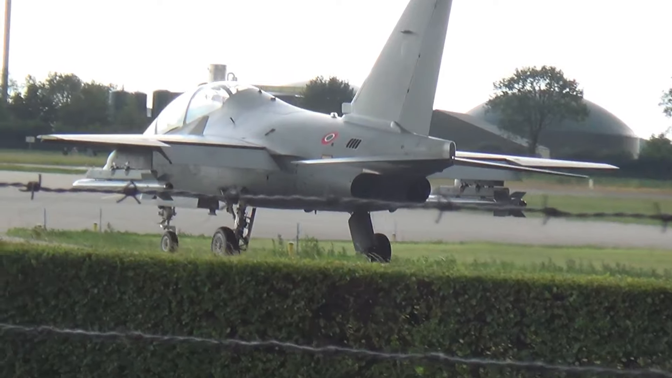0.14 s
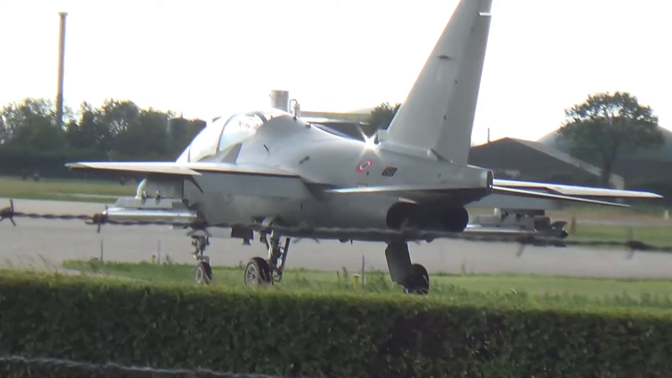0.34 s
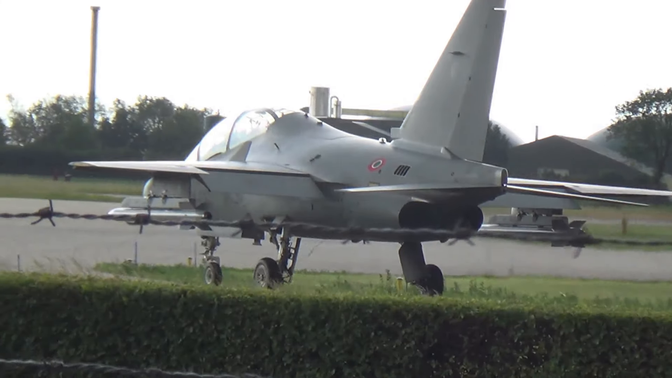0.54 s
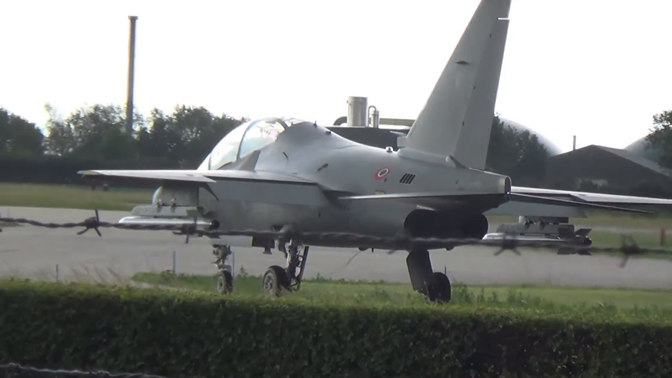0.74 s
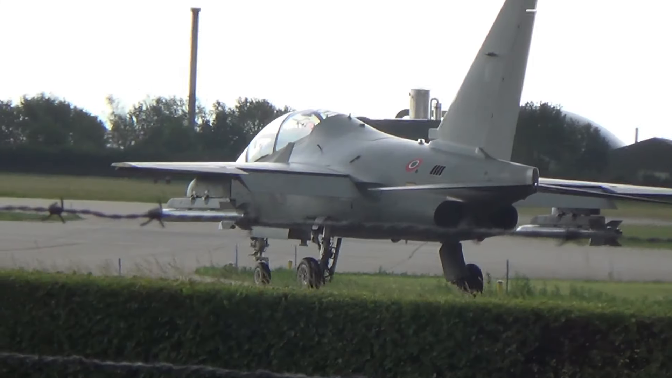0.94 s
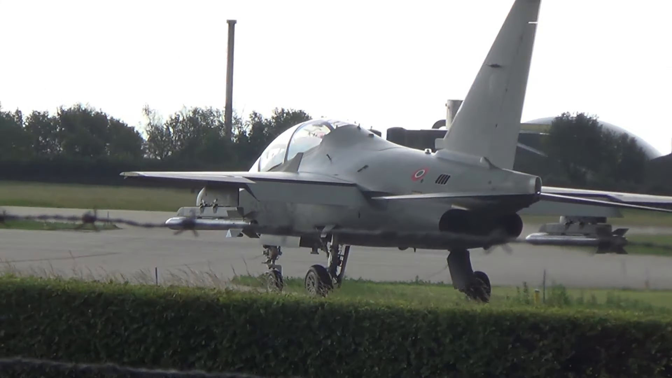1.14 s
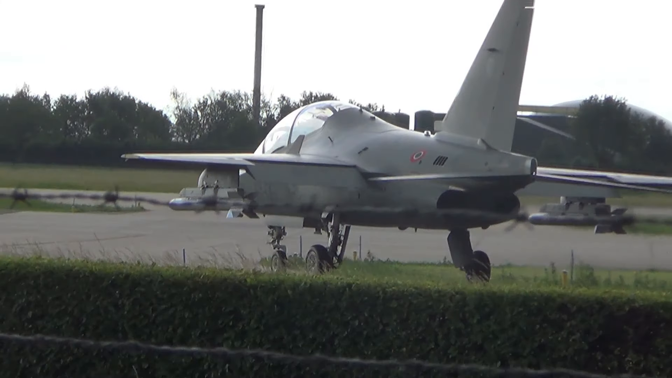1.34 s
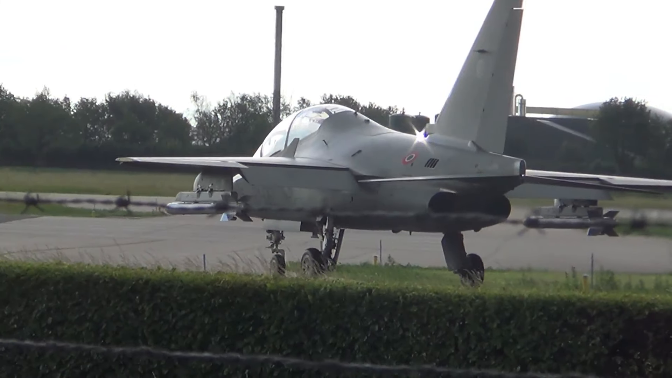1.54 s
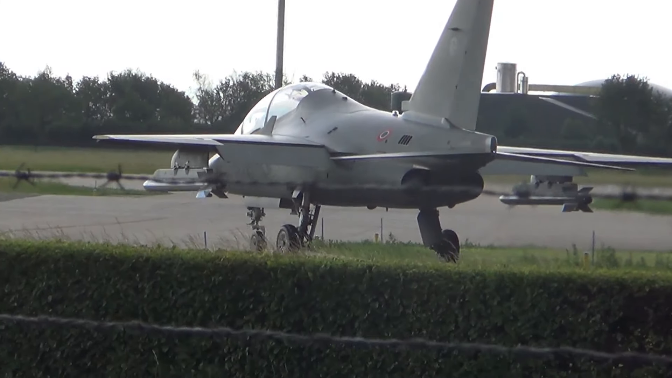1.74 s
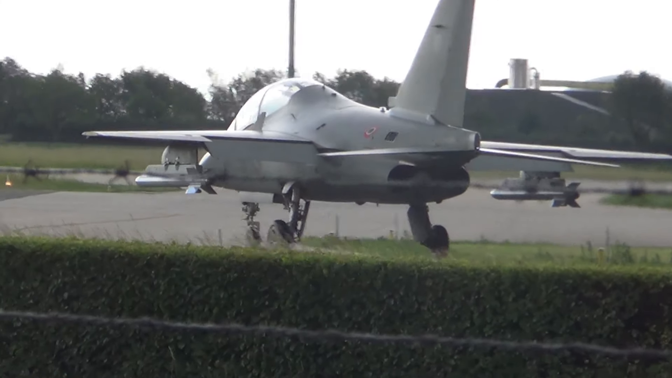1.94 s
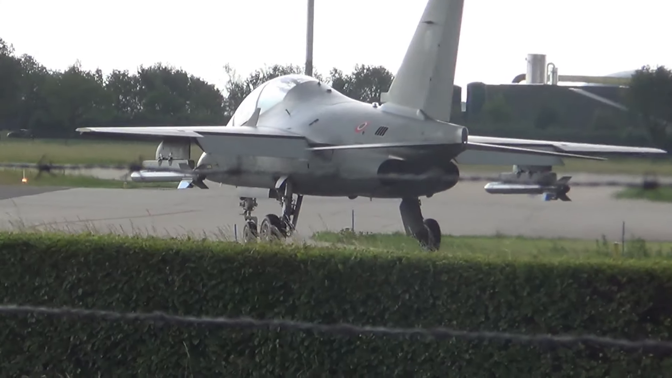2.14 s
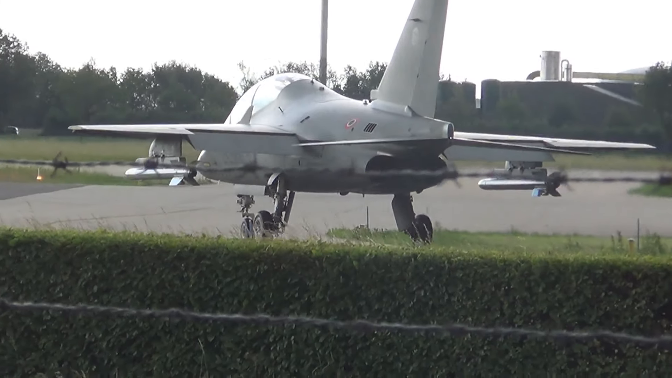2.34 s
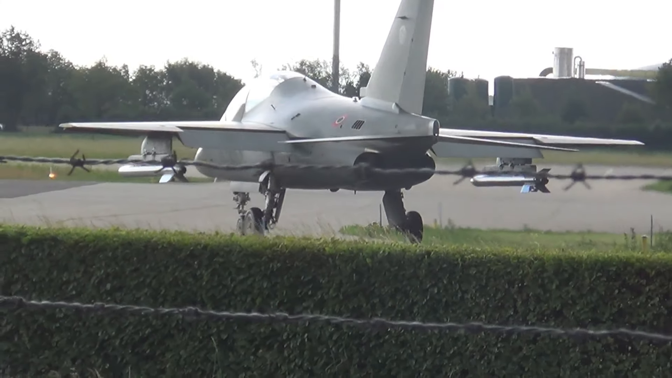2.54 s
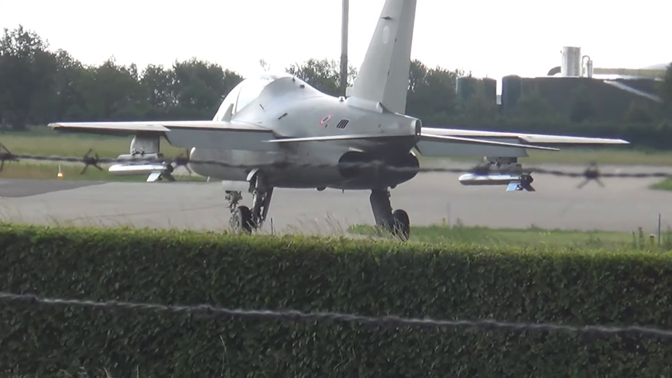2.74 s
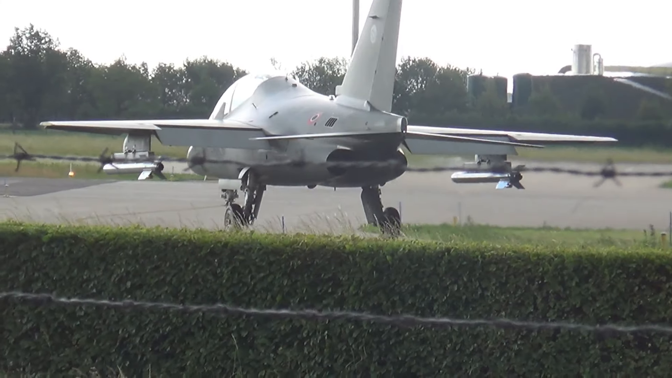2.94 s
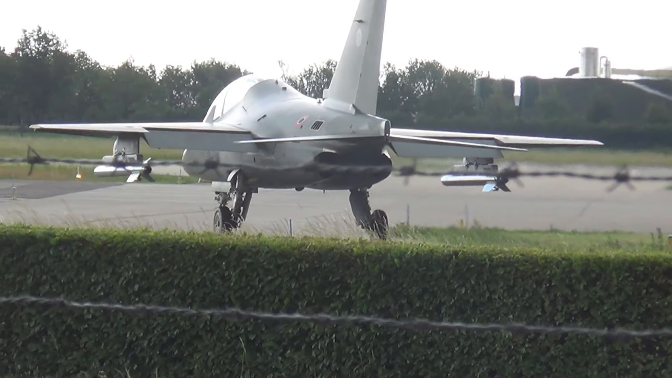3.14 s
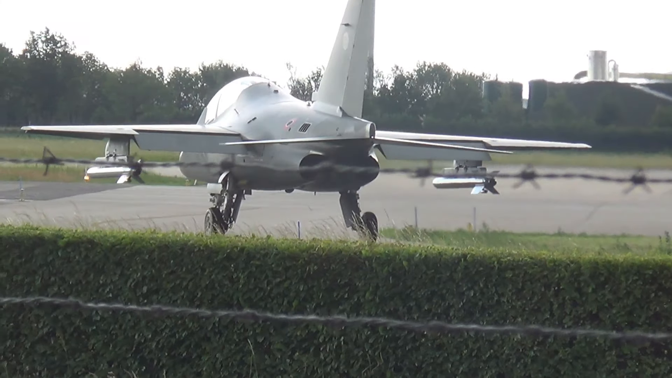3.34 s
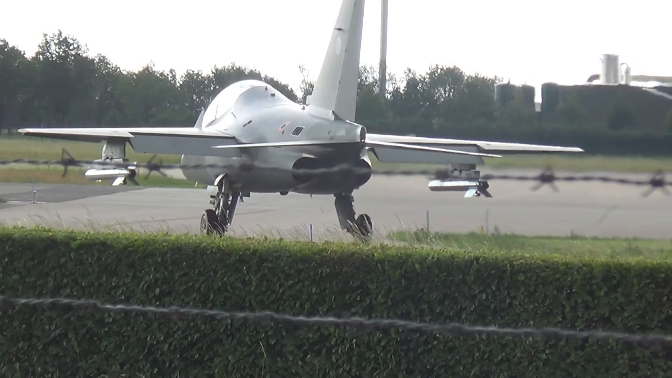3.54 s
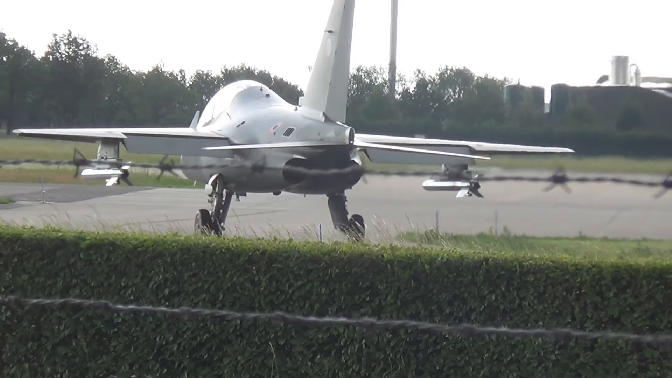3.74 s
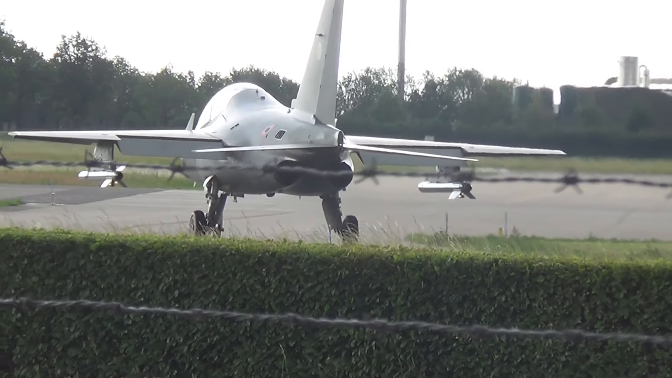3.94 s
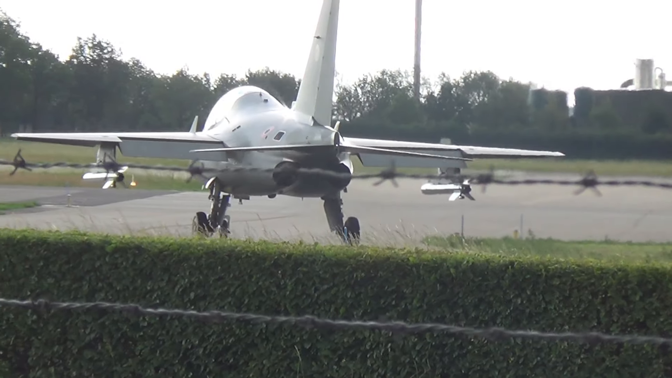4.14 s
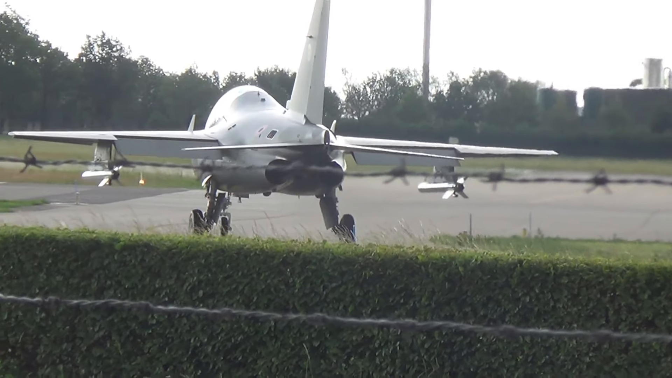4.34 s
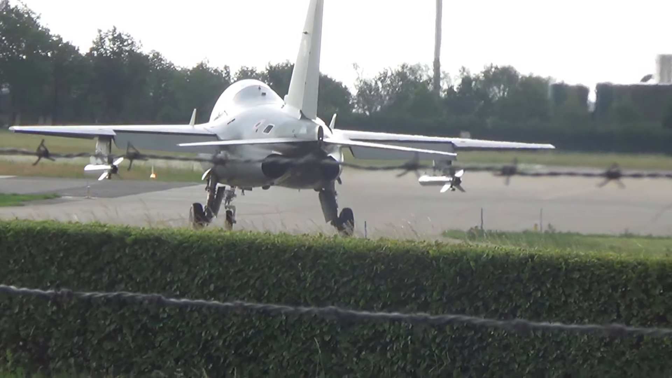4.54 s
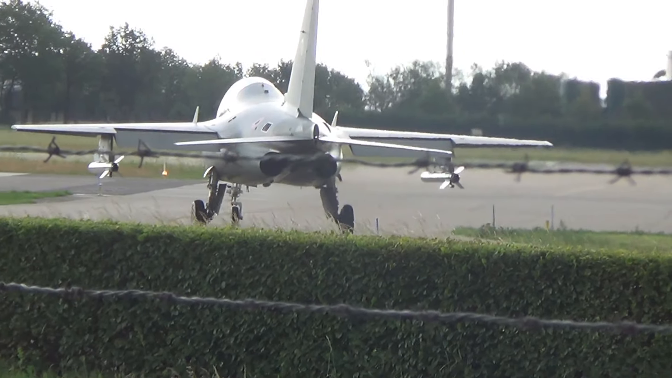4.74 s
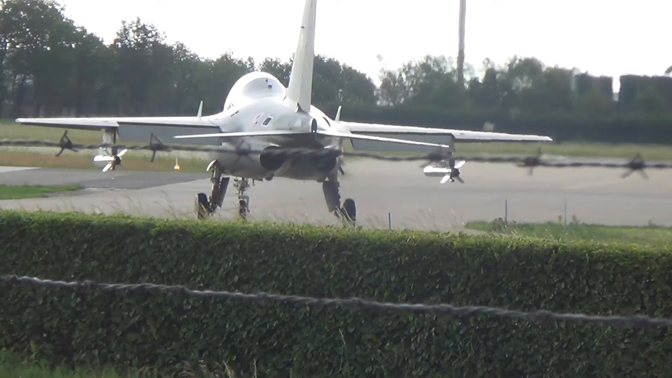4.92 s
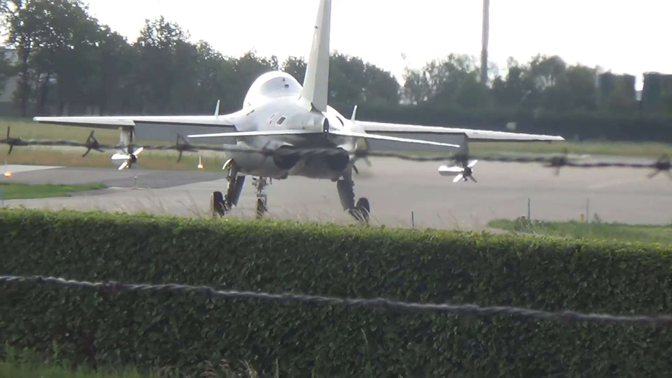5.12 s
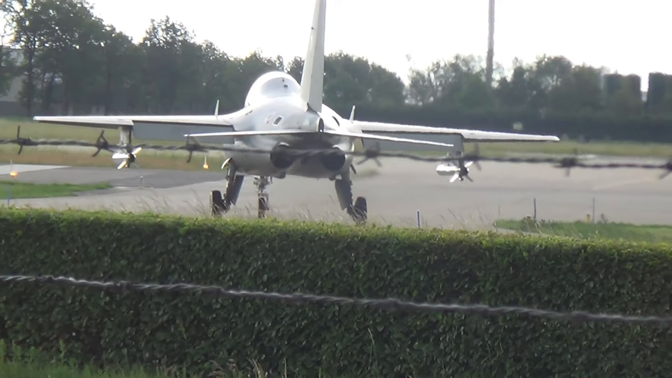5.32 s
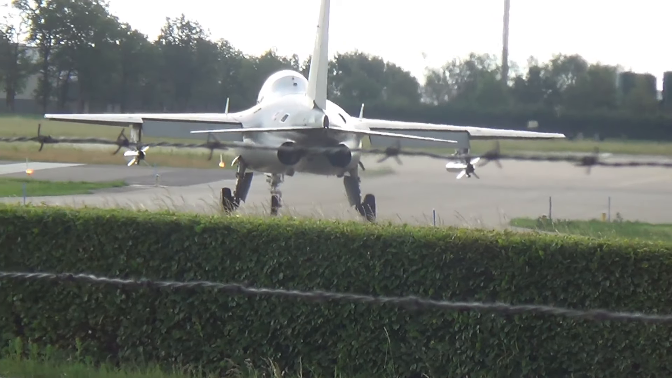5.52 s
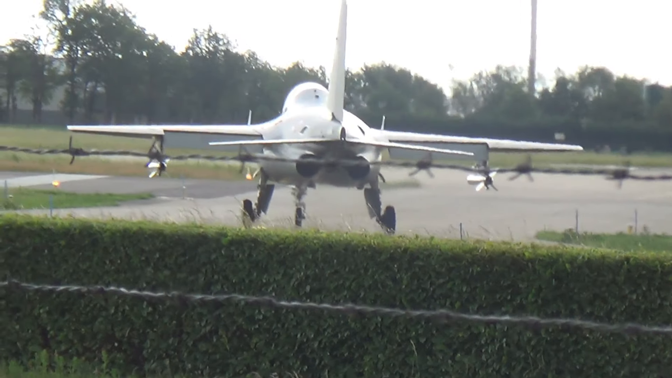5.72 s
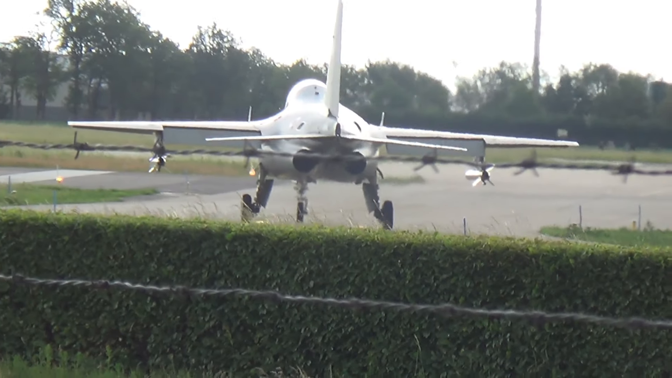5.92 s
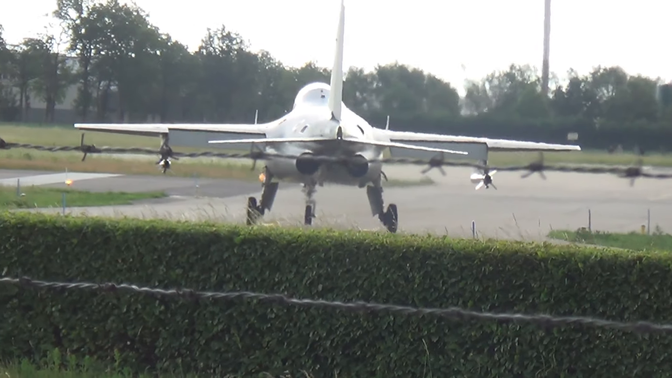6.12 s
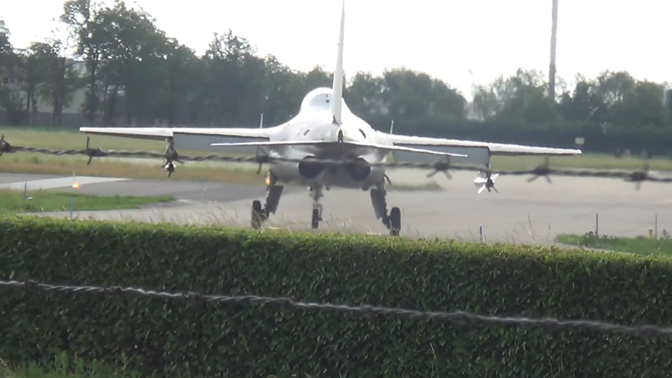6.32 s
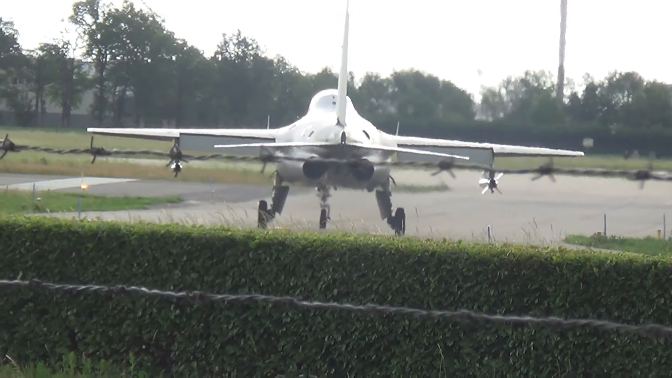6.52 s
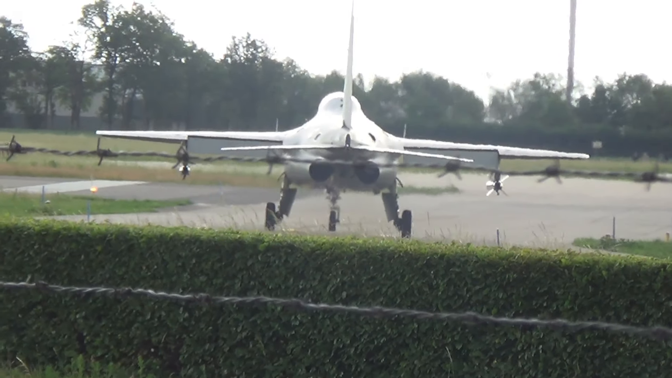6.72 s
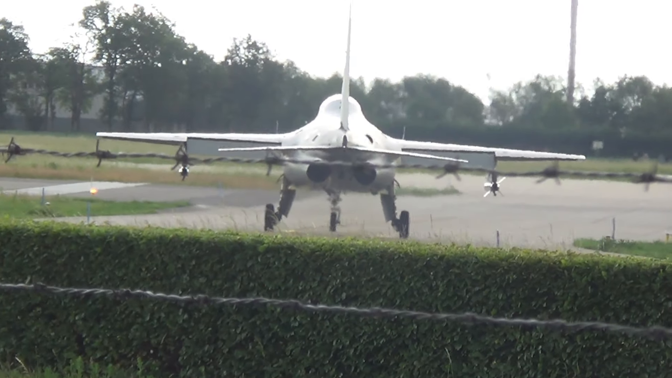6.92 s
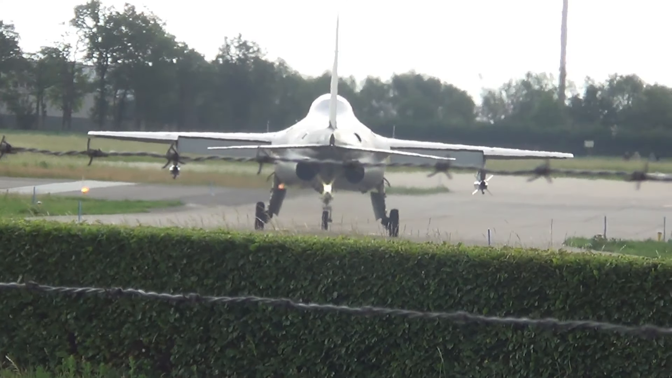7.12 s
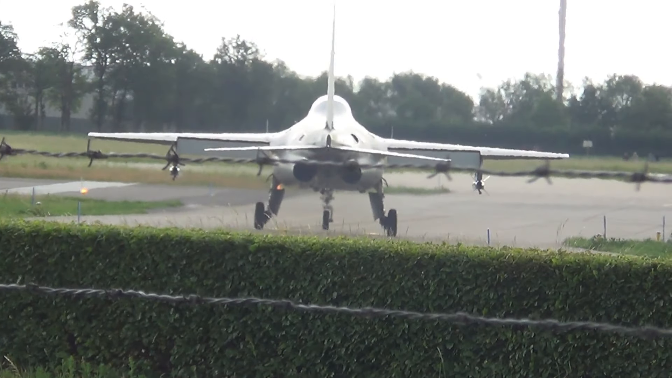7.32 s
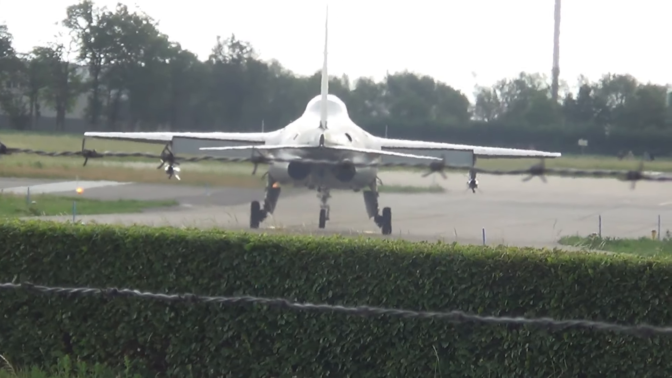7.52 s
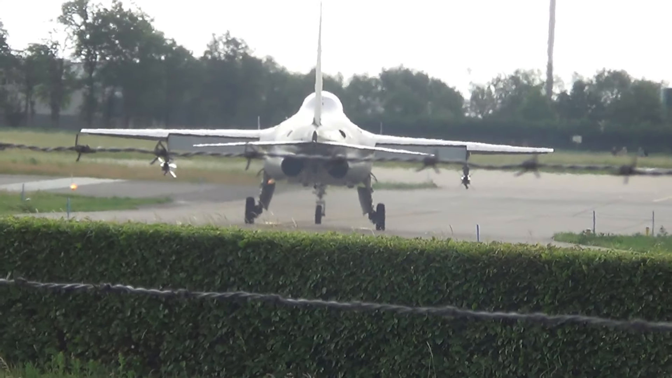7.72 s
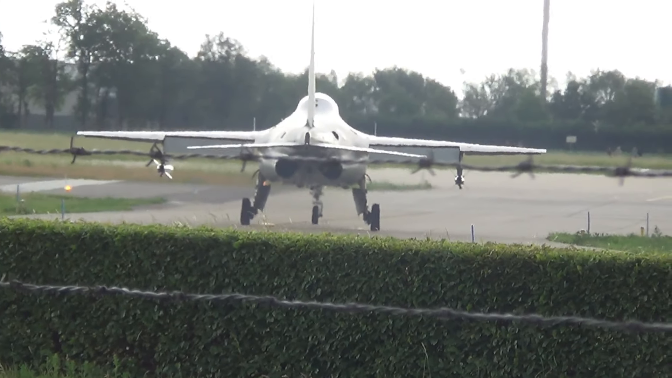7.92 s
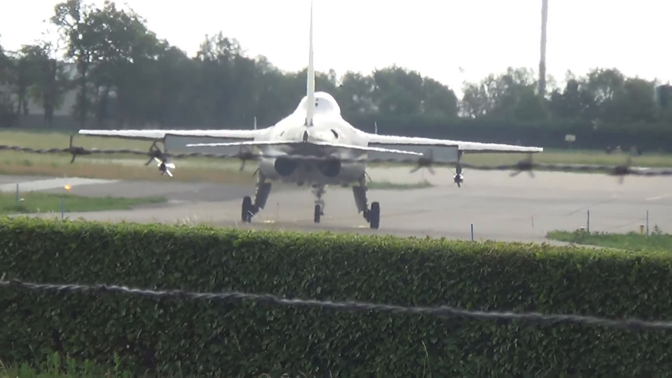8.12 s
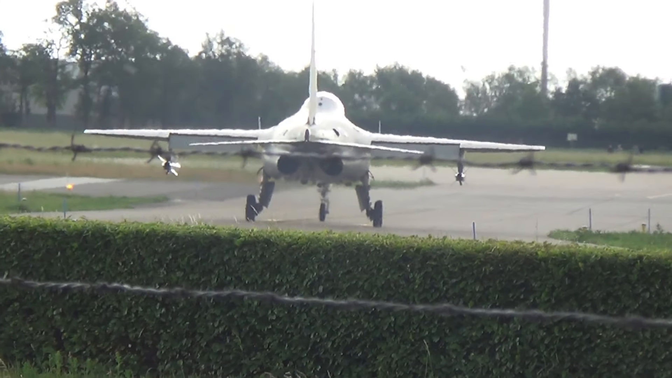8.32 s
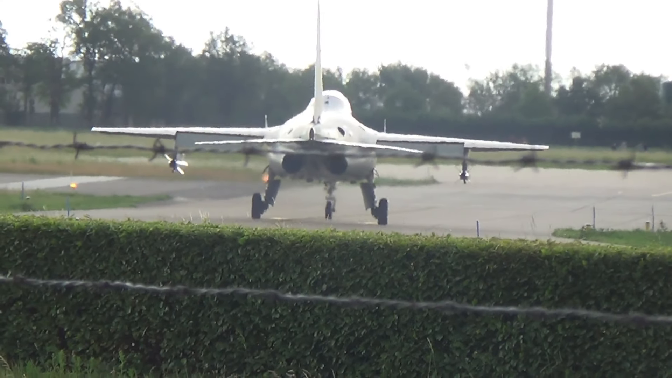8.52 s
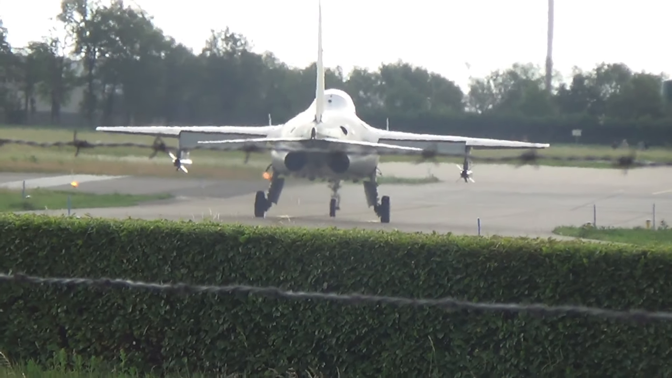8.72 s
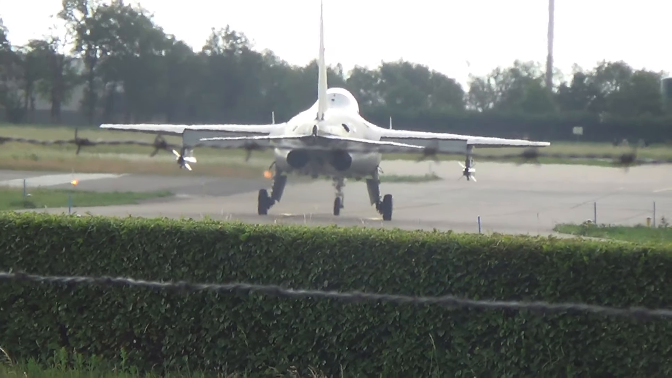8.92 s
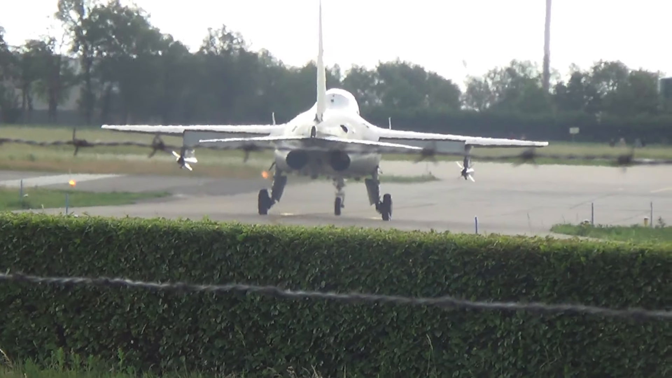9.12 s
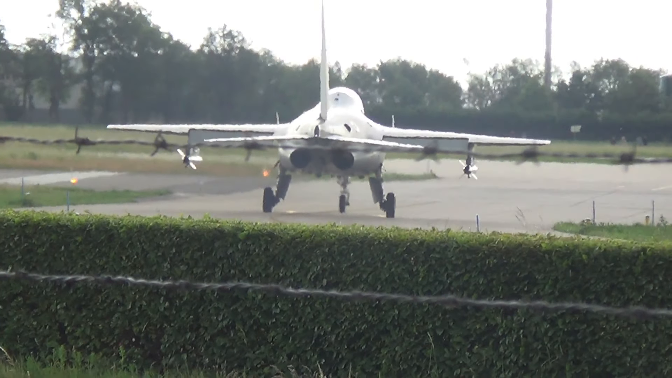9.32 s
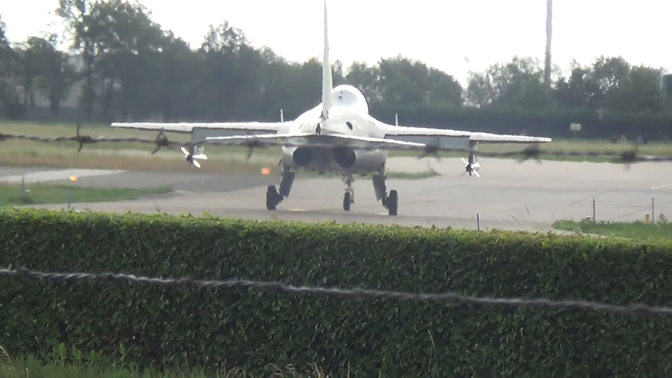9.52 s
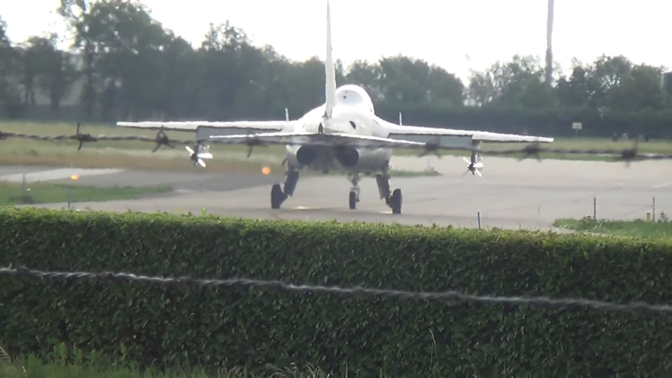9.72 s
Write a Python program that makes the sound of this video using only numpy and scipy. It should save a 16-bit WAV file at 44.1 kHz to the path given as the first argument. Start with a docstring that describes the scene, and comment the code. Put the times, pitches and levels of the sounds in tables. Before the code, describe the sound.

Heard from a hand-held camera beside a taxiway, a jet's engines rush loudly with a thin wavering whine, while low wind rumbles on the microphone. The roar swells slightly, then sinks to a soft hiss as the aircraft turns and leaves. In the quieter second half, the lens motor whirrs faintly with a ringing edge, fingers bump the camera body, and a very faint electronic whine sits above the far airfield background.

```python
"""A twin-engine jet trainer turns on a taxiway and rolls away: rumble, core roar, turbine rush and
thin blade tones. Wind buffets the microphone ports while the exhaust sweeps by. As the jet leaves, a
hand-held camera's lens drive is heard: 50 small steps a second ring its metal parts. Fingers knock on
the body and the picture electronics whine faintly, over steady far airfield noise."""
import sys
import numpy as np
from scipy import signal
from scipy.io import wavfile

SR = 44100
rng = np.random.default_rng(int(sys.argv[2]) if len(sys.argv) > 2 else 0)


def to_wav(s):
    """Save 16-bit WAV."""
    ch = np.atleast_2d(s).T  # columns
    pcm = np.round(np.clip(ch, -1, 1) * 32767)  # PCM
    wavfile.write(sys.argv[1], SR, pcm.astype(np.int16))


N = 434826

# Far airfield and microphone hiss: f/Hz, relative density/dB
FIELD_SPECTRUM = [(25, -51), (70, 6), (120, -16), (160, -4), (270, 5), (450, 4), (1000, 9.5), (1900, -0.5),
                  (3200, -2), (6000, -4.5), (9000, -23), (11500, -28), (12600, -42), (15500, -48)]
# f/Hz, L-R correlation, L-R level/dB, left lead/rad
FIELD_IMAGE = [(60, .997, -.5, 0), (320, 1, -1.2, 0), (640, 1, -3.5, 0), (2000, .4, -1, 0),
               (5000, 0.1, 3, 0), (9000, 1, -1, 0), (15000, .97, -1, 0)]
# f/Hz, width/Hz, gain/dB
FIELD_RESONANCES = [(285, 18, 5), (433, 88, 6.5)]

# Picture electronics: t/s, level/dB
WHINE_LEVELS = [(0, -92), (4.4, -94), (4.6, -67), (9.86, -81)]
# Fingers on the body: t/s, relative level/dB
KNOCKS = [(5.608, -43), (5.749, -46), (5.881, -36), (7.268, -41)]

# Metal parts of the lens drive: f/Hz
MODES_HZ = [495, 1491, 2543, 2557, 2668, 3756, 5124, 5146, 6078, 6674, 8360, 9604, 10207, 11375, 11725,
            12209, 13954, 14373]
# Per mode: gain/dB, t60/s, L-R level/dB, left lead/rad, L-R correlation
MODES = [(-17, .2, -1, 0, .9), (-12, .15, -11, -1.3, .8), (-.5, .4, -11, 2.6, .6), (-12, .3, -3, 1.2, .5),
         (0, .3, -3, .6, .8), (0, .19, -6, 1.1, .8), (-3.5, .15, -2, .8, .7), (-2, .2, -2, .8, .7),
         (-18, .08, 0, .4, .5), (-3, .11, 9, .6, .7), (0, .13, 1.6, .5, .95), (-18, .1, .4, .2, .95),
         (-12, .06, 2.7, .25, .93), (-22, .045, 0, 0, .95), (-20, .08, 0, 0, .95), (-27, .05, 0, 0, .97),
         (-33, .04, 0, 0, .97), (-35, .03, 0, 0, .97)]
# Borders between the modes' effort curves: f/Hz
EFFORT_BORDERS_HZ = [2600, 3000, 4500, 6400, 7500, 9000]
# t/s, level/dB below 2.6 kHz, level/dB at 6.4-7.5 kHz and above 9 kHz
EFFORT_LOW_HIGH = [(0, -47, -47), (4.3, -55, -49), (4.9, -45, -48), (5.3, -48.5, -43), (5.6, -45.5, -47),
                   (5.8, -44, -42), (6.4, -43.5, -46), (6.85, -48, -48), (7.0, -42.5, -51),
                   (7.2, -49.5, -51), (7.75, -43.5, -40), (8.05, -49.5, -51.5), (8.6, -52.5, -49.5),
                   (8.9, -45, -46.5), (9.1, -47, -47), (9.5, -43, -43.5), (9.7, -47.5, -49),
                   (9.86, -56, -51)]
# t/s, level/dB at 2.6-3, 3-4.5 and 4.5-6.4 kHz
EFFORT_MIDDLE = [(4.6, -66, -62, -64), (5.2, -64, -53, -53), (5.8, -60, -55, -54), (6.3, -68, -53, -54),
                 (6.9, -66, -55, -57), (7.25, -63, -57, -57), (7.5, -64, -49, -57), (7.7, -61, -53, -48),
                 (8.0, -70, -57, -55), (8.35, -72, -55, -55), (8.65, -72, -53, -58), (8.95, -62, -56, -58),
                 (9.2, -57, -57, -50), (9.5, -54, -57, -51), (9.86, -60, -57, -52)]
# t/s, level/dB at 7.5-9 kHz
EFFORT_BRIGHT = [(5.6, -51), (5.82, -44), (6.1, -49), (6.35, -44), (6.73, -51), (7.2, -58), (7.41, -53),
                 (7.68, -45.5), (8.07, -58.5), (8.65, -57), (8.9, -56), (9.46, -50.5), (9.86, -60)]

# f/Hz, relative density/dB
WIND_SPECTRUM = [(25, -33), (60, -22), (130, 6), (200, -9.5), (350, -7), (500, -17.5)]

# Blade tones, paired where the engines differ: f/Hz, width/Hz, index of swell curve
BLADE_TONES = [(2556, 8, 3), (2566, 8, 3), (2972, 8, 1), (4322, 4, 1), (4437, 6, 2), (4448, 6, 2),
               (4574, 5, 0), (4592, 6, 0), (4722, 8, 2), (7673, 10, 1), (8076, 14, 0), (11563, 10, 0)]
# Per tone: level/dB, share of its swell, share of the hiss swing, slope/(dB/s)
BLADE_MIX = [(-39, 1, 0, 0), (-39, 1, 0, 0), (-47, .5, .3, 0), (-40, 1, 0, 0), (-50, 1, 0, 0),
             (-50, 1, 0, 0), (-34.5, 1, 0, 0), (-38.5, 1, 0, 0), (-48, 1, 0, 0), (-45, .6, .5, -.3),
             (-41, .32, .69, .2), (-46, .1, .5, -2.2)]
# Intakes turning away: t/s, gain/dB of main whistle, lower whistle, faint cluster, fan tone
BLADE_SWELLS = [(0, -3, -4, -4, -3), (.6, -1, -8, -4, -2), (1.1, -4, -8, -4, 0), (1.35, 2, -8, -3, 0),
                (1.6, 1, 1, 0, 1), (1.9, 0, -1, 0, 0), (2.2, 5, 0, 0, 0), (2.55, -4, -8, -4, 0),
                (2.9, -7, -12, -4, 1), (3.15, -6, 0, -4, -4), (4.05, -8, -3, -6, -5), (4.35, -2, 1, -6, -5),
                (4.6, -4, -7, -6, -8), (4.85, -15, -11, -9, -2), (5.2, -12, -16, -9, -13),
                (5.9, -21, -25, -16, -22), (6.5, -30, -32, -17, -30), (7.0, -32, -34, -13, -32),
                (7.4, -32, -36, -22, -34), (7.7, -29, -36, -21, -34), (9.86, -34, -36, -30, -40)]
# t/s, pitch factor
DOPPLER = [(0, 1.001), (4, 0.9992), (9.86, 0.999)]

# Jet turning and leaving: t/s, relative level/dB of roar, rush, hiss
JET_LEVELS = [(0, -26, -31.5, -29.5), (.4, -27, -32.5, -26.5), (.8, -24.5, -28.5, -30.5),
              (1.25, -20.5, -30, -32), (1.75, -20.5, -27.5, -30.5), (2.0, -20, -29, -29),
              (2.4, -19, -30.5, -34), (2.75, -18, -32.5, -30), (3.15, -19, -33, -27.5),
              (3.7, -22, -31, -34), (4.0, -27, -30.5, -33.5), (4.45, -27, -29, -38.5),
              (4.8, -33, -38, -40.5), (5.1, -36, -41.5, -39), (5.6, -44, -45.5, -48),
              (5.87, -45, -49.5, -46), (6.3, -47.5, -54.5, -52.5), (9.86, -68, -59, -55.5)]
# Close pass: f/Hz, relative density/dB
JET_SPECTRUM = [(25, -60), (60, -24), (140, -14.5), (230, -18.5), (470, -2), (700, 0), (950, -2),
                (1400, -9), (2100, -11), (3000, -15), (4600, -12.5), (7000, -18.5), (9500, -18),
                (15500, -20.5)]
# f/Hz, L-R correlation, L-R level/dB, left lead/rad
JET_IMAGE = [(150, .995, .01, .01), (300, .98, 1.4, -.33), (800, .99, .5, -.17), (2000, .975, 1.5, -.17),
             (4500, .975, .6, -.3), (7000, .995, .01, .01), (9000, 1, 0, 0)]
# Rumble up to sizzle: f/Hz, shares of the roar, rush and hiss swings, slope/(dB/s)
JET_ZONES = [(125, 0.13, 0.067, 0.054, -1.16), (453, 0.48, 0.26, 0.038, -1.58),
             (780, 1.163, .01, .01, -0.34), (2050, 0.011, 1.04, .01, -0.26), (3830, .01, 0.72, 0.17, -1.45),
             (5900, .01, 0.14, 0.87, -0.98), (9000, .01, .01, 1.054, -0.2)]
# Dips and humps where reflections meet the direct sound: start/s, end/s, f/Hz, width/Hz, gain/dB
INTERFERENCE = [(-0.5, 2.56, 1610, 470, -10), (2.5, 3.13, 1750, 340, -4), (2, 2.8, 290, 82, -4),
                (3.5, 4.1, 6000, 1400, -3), (1.2, 1.6, 6100, 870, -2.5), (2.3, 4, 505, 43, -2.5),
                (-3.5, 2.18, 2880, 960, -5), (2.5, 5.1, 1106, 160, -6), (3.5, 4.7, 1480, 220, 4.5),
                (-1, 0.44, 1360, 490, 7), (1, 2.17, 1180, 330, -5.5), (0.5, 1.1, 5400, 960, 4),
                (-0.5, 2.32, 3680, 280, 3.5), (4, 6.7, 842, 63, 4.5), (4, 10.5, 186, 51, -23),
                (3, 4.9, 327, 78, -11), (-1, 7.2, 8210, 450, 7), (0, 4.7, 850, 93, 1),
                (4, 5.2, 540, 36, -10), (-2, 2.4, 4220, 160, -3.5), (1.5, 3.22, 4200, 480, -2.5),
                (4, 4.65, 3400, 1100, 2), (3, 4.1, 2200, 200, 4), (5, 6.6, 1420, 250, 3.5),
                (-3, 1.6, 260, 100, 4.5), (5.5, 6.4, 710, 230, 5.5), (-1, 2.35, 395, 70, -4),
                (-0.5, 1.32, 2150, 300, 3), (2.5, 3.9, 1490, 180, 2.5), (-1, 0.97, 490, 70, 3),
                (0.5, 3, 2420, 120, -6)]

CLOSE_PASS_S = 4
PICTURE_RATE_HZ = 50
TIME_S = np.arange(N) / SR


def from_db(db):
    """Decibels to gain."""
    return 10 ** (np.asarray(db) / 20)


def unit_rms(x):
    """Scale to rms 1."""
    return x / np.sqrt(np.mean(np.abs(x) ** 2) + 1e-20)


def curves(table):
    """Columns of a time table, one value a sample."""
    times_s, *columns = np.transpose(table)
    return np.array([np.interp(TIME_S, times_s, column) for column in columns])


def swings_db(table):
    """Level curves relative to their close-pass mean."""
    levels_db = curves(table)
    return levels_db - levels_db[:, :CLOSE_PASS_S * SR].mean(axis=1, keepdims=True)


def at_hz(table, hz):
    """Columns of a frequency table, interpolated in log f."""
    points_hz, *columns = np.transpose(table)
    return [np.interp(np.log(hz), np.log(points_hz), column) for column in columns]


def drift(corner_hz):
    """Slow noise of rms 1, through a two-pole low-pass."""
    hop = 40
    pole = np.exp(-2 * np.pi * corner_hz * hop / SR)
    noise = rng.standard_normal(N // hop + 2002)
    slow = signal.lfilter([1], [1, -2 * pole, pole * pole], noise)[2000:]
    return np.interp(np.arange(N) / hop, np.arange(len(slow)), unit_rms(slow))


def ring(force, hz, t60_s):
    """One mode: a unit click starts a decaying complex sine of height 1."""
    pole = from_db(-60 / (t60_s * SR)) * np.exp(2j * np.pi * hz / SR)
    return signal.lfilter([1], [1, -pole], force + 1e-18)


def stereo_pair(mid, side, correlation):
    """Left and right of given correlation from two independent signals."""
    correlation = np.clip(correlation, 0, 1)
    opposed = side * np.array([[1], [-1]])
    return (np.sqrt(1 + correlation) * mid + np.sqrt(1 - correlation) * opposed) / np.sqrt(2)


def noise_bands(spectrum, image):
    """Yield centre/Hz and stereo noise for each third octave."""
    edges_hz = 25 * 2 ** np.arange(0, 9.4, 1 / 3)
    centres_hz = np.sqrt(edges_hz[1:] * edges_hz[:-1])
    white = rng.standard_normal((2, 2, N))
    gains = from_db(at_hz(spectrum, centres_hz)[0])
    gains /= np.sqrt(np.sum(gains ** 2 * np.diff(edges_hz)) * 2 / SR)
    for k, hz in enumerate(centres_hz):
        bandpass = signal.butter(2, edges_hz[k:k + 2], "band", fs=SR, output="sos")
        correlation, pan_db, lead_rad = at_hz(image, hz)
        pair = stereo_pair(*signal.sosfilt(bandpass, white[k % 2]), correlation)
        quadrature = np.gradient(pair[0]) / np.sin(2 * np.pi * hz / SR)
        pair[0] = np.cos(lead_rad) * pair[0] + np.sin(lead_rad) * quadrature
        yield hz, gains[k] * from_db([[pan_db / 2], [-pan_db / 2]]) * pair


def timed_bell(x, start_s, end_s, hz, width_hz, gain_db, fade_s=0.11):
    """Boost or cut one resonant band, fading in and out."""
    r = np.exp(-np.pi * width_hz / SR)
    feedback = [1, -2 * r * np.cos(2 * np.pi * hz / SR), r * r]
    band = signal.lfilter([(1 - r * r) / 2, 0, (r * r - 1) / 2], feedback, x)
    fade = np.clip(np.minimum(TIME_S - start_s, end_s - TIME_S) / fade_s + .5, 0, 1)
    return x + (from_db(gain_db * fade) - 1) * band


def airfield(gain_db=-44.5):
    """Steady far noise and microphone hiss, with two faint resonant hums."""
    out = sum(band for hz, band in noise_bands(FIELD_SPECTRUM, FIELD_IMAGE))
    for resonance in FIELD_RESONANCES:
        out = timed_bell(out, 0, N / SR, *resonance)
    return from_db(gain_db) * out


def electronics_whine(line_hz=15625, throb_depth=.6):
    """Thin high tone, throbbing at the picture rate."""
    throb = 1 + throb_depth * signal.sawtooth(2 * np.pi * PICTURE_RATE_HZ * TIME_S - .5, 0)
    tone = np.sqrt(2) * np.sin(2 * np.pi * line_hz * TIME_S)
    return from_db(curves(WHINE_LEVELS)[0]) * throb * tone


def finger_knocks(body_hz=170, t60_s=.03):
    """Dull knocks through the camera body push the two ports in opposite senses."""
    blows = np.zeros(N)
    for time_s, level_db in KNOCKS:
        blows[round(time_s * SR)] = from_db(level_db - 6)
    body = ring(blows, body_hz, t60_s).imag
    softened = ring(body, body_hz, t60_s).imag / 40   # second pass slows the onset
    return softened * np.array([[1.3], [-.7]])


def drive_scrape(first_s=.0111, uneven_db=1.5, t60_s=.034, floor_db=.5):
    """Evenly timed steps of uneven force, each a decaying scrape over a steady floor."""
    onsets = np.round(np.arange(first_s, N / SR, 1 / PICTURE_RATE_HZ) * SR).astype(int)
    steps = np.zeros(N)
    steps[onsets] = from_db(rng.standard_normal(len(onsets)) * uneven_db)
    return unit_rms(ring(steps, 0, t60_s).real) + from_db(floor_db)


def lens_drive(rattle_db=-18, held_share=.72, throb_depth=.99, wander_hz=4):
    """Each step rattles and rings the metal parts; a held share sings on between steps."""
    scrape = drive_scrape()
    throb = unit_rms(1 + throb_depth * scrape)
    low_db, high_db = curves(EFFORT_LOW_HIGH)
    efforts = from_db([low_db, *curves(EFFORT_MIDDLE), high_db, *curves(EFFORT_BRIGHT), high_db])
    mid, side = rng.standard_normal((2, N))
    rattle_band = signal.butter(3, [5000, 12000], "band", fs=SR, output="sos")
    out = from_db(rattle_db) * signal.sosfilt(rattle_band, efforts[-1] * scrape * mid)
    for hz, (gain_db, t60_s, pan_db, lead_rad, correlation) in zip(MODES_HZ, MODES):
        effort = efforts[np.searchsorted(EFFORT_BORDERS_HZ, hz)]
        ring_gain = np.sqrt(t60_s * SR / (12 * np.log(10)))
        rub = stereo_pair(mid, side, correlation) * effort * scrape / ring_gain   # same rms for any t60
        pitch_hz = hz + wander_hz * drift(corner_hz=4)
        held = np.sqrt(2) * effort * throb * np.exp(2j * np.pi * np.cumsum(pitch_hz) / SR)
        mode = np.sqrt(1 - held_share) * ring(rub, hz, t60_s) + np.sqrt(held_share) * held
        ports = from_db([[gain_db + pan_db / 2], [gain_db - pan_db / 2]]) * np.exp([[1j * lead_rad], [0]])
        out = out + (mode * ports).real
    return out


def wind(gain_db=-41.5, ease_db_per_s=2.5, drop_at_s=4.17, drop_db_per_s=24, gust_db=2.9):
    """Low, lumpy buffeting, independent at each port, far stronger on the left."""
    image = [(60, 0, 26.0, 0), (400, 0, 27.4, 0.0038)]   # columns as FIELD_IMAGE
    buffet = sum(band for hz, band in noise_bands(WIND_SPECTRUM, image) if hz < 600)
    fall_db = ease_db_per_s * TIME_S + drop_db_per_s * np.maximum(TIME_S - drop_at_s, 0)
    return from_db(gain_db - fall_db + gust_db * drift(corner_hz=7.2)) * buffet


def blade_tones(wander_db=.8, roughness=.38):
    """Engine blade tones, each in a skirt of narrow noise; pitch sinks slightly as the jet recedes."""
    source_time_s = np.cumsum(curves(DOPPLER)[0]) / SR
    swells_db = curves(BLADE_SWELLS)
    hiss_db = swings_db(JET_LEVELS)[2]
    out = 0
    for (hz, width_hz, swell), mix in zip(BLADE_TONES, BLADE_MIX):
        base_db, swell_share, hiss_share, db_per_s = mix
        level_db = base_db + swell_share * swells_db[swell] + hiss_share * hiss_db + db_per_s * TIME_S
        level_db += wander_db * drift(corner_hz=1.5)
        waver = 1 + roughness * (drift(width_hz) + 1j * drift(width_hz))
        tone = (waver * np.exp(2j * np.pi * hz * source_time_s)).real
        out = out + from_db(level_db) * unit_rms(tone)
    return out


def jet_roar(gain_db=-16, shimmer_db=1.4, flicker_db=1.45, treble_cutoff_hz=11350):
    """Broad engine noise whose zones swell and sink; hot air makes the treble shimmer."""
    centres_hz, *weights = np.transpose(JET_ZONES)
    zones_db = np.transpose(weights) @ [*swings_db(JET_LEVELS), TIME_S - CLOSE_PASS_S / 2]
    shimmer, flicker = drift(corner_hz=41), drift(corner_hz=5)
    out = 0
    for k, (hz, band) in enumerate(noise_bands(JET_SPECTRUM, JET_IMAGE)):
        zone = np.interp(np.log(hz), np.log(centres_hz), np.arange(len(centres_hz)))
        below = min(int(zone), len(centres_hz) - 2)
        level_db = zones_db[below] + (zone - below) * (zones_db[below + 1] - zones_db[below])
        scatter = np.clip(np.log2(hz / 1200) / 4.25, 0, 1)   # short waves scatter most
        if k % 3 == 0:   # one flicker per octave
            flicker = drift(corner_hz=3.7)
        out = out + from_db(level_db + scatter * (shimmer_db * shimmer + flicker_db * flicker)) * band
    for bell in INTERFERENCE:
        out = timed_bell(out, *bell)
    treble_cut = signal.butter(8, treble_cutoff_hz, fs=SR, output="sos")
    return from_db(gain_db) * signal.sosfilt(treble_cut, out)


def scene():
    """Aircraft, camera noises, airfield and wind, in stereo."""
    aircraft = jet_roar() + blade_tones()
    camera = lens_drive() + finger_knocks() + electronics_whine()
    return aircraft + camera + airfield() + wind()


def record(dry):
    """Soft clip, then a steep low-pass at 15750 Hz."""
    rounded = .85 * np.tanh(dry / .85)
    lowpass = signal.ellip(12, .3, 70, 15750, fs=SR, output="sos")
    return signal.sosfilt(lowpass, rounded)


dry = scene()
out = record(dry)
to_wav(out)
```